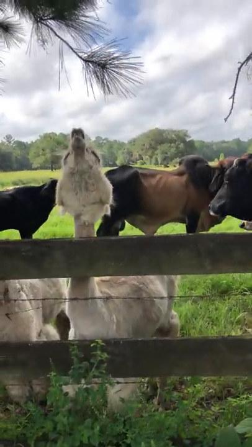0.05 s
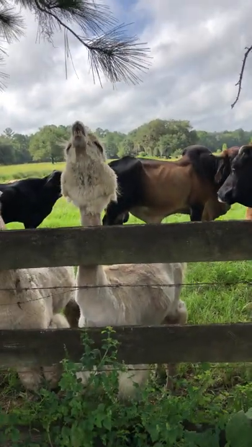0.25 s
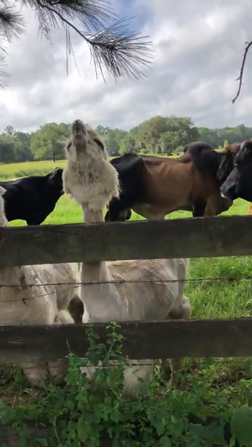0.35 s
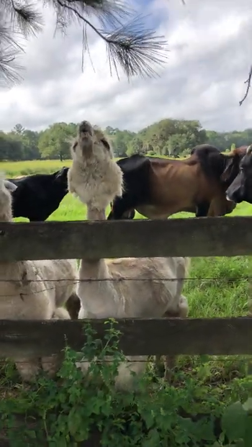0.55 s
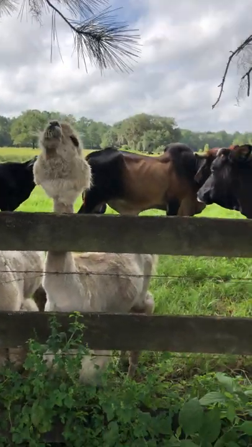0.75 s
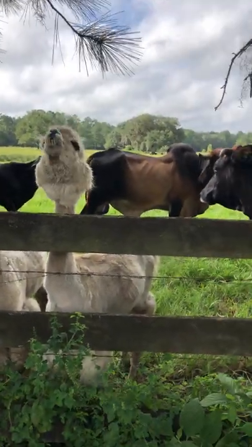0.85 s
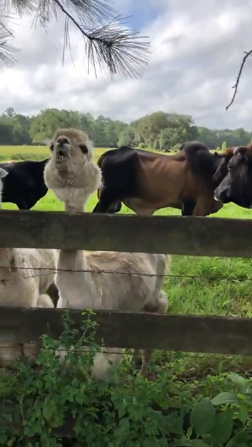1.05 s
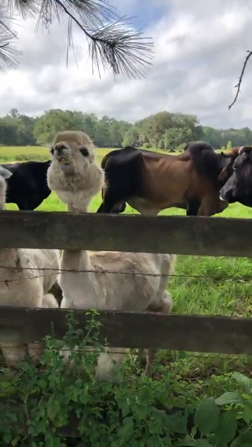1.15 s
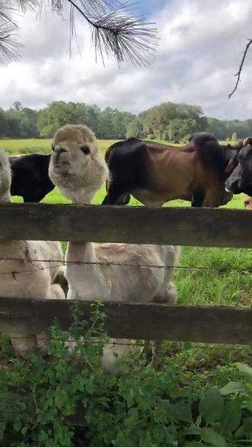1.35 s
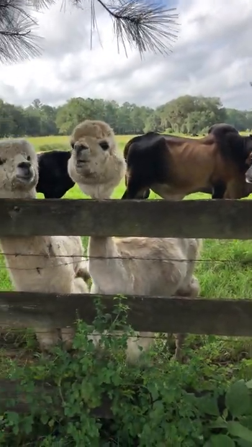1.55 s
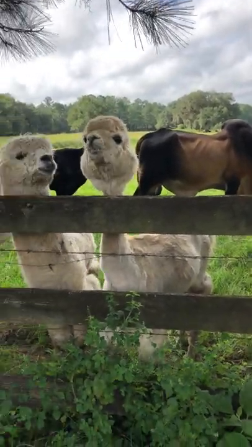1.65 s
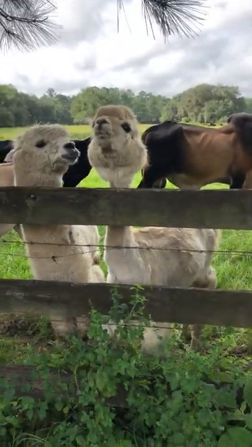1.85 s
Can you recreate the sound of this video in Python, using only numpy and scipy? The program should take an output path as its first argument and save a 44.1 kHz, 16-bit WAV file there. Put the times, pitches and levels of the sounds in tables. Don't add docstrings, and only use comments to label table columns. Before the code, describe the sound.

One cow's moo rises from closed-mouth hum to open bellow while wind buffets the microphone

```python
import sys
import numpy as np
from scipy import signal
from scipy.fft import rfft, irfft, next_fast_len
from scipy.io import wavfile
from scipy.ndimage import uniform_filter1d, map_coordinates

SR = 44100
rng = np.random.default_rng(int(sys.argv[2]) if len(sys.argv) > 2 else 0)


def makeup_ratio(level_db):
    decades = np.asarray(level_db, float) / 20
    return 10 ** decades


def unload_wav(signal):
    wavfile.write(
        sys.argv[1],
        SR,
        np.round(np.clip(np.atleast_2d(signal).T, -1, 1) * 32767).astype(np.int16),
    )


N = 83790


def unit(x):
    return x / np.sqrt(np.mean(x ** 2) + 1e-20)


def clock():
    return np.arange(N) / SR


def wobble(rate_hz):
    knots = rng.standard_normal(int(N * rate_hz / SR) + 4)
    return map_coordinates(knots, [clock() * rate_hz])


def filtered(x, response):
    m = next_fast_len(N + SR // 2)
    return irfft(rfft(x, m) * response(np.fft.rfftfreq(m, 1 / SR)), m)[:N]


def resonant(x, peaks):
    def response(f):
        total = 0
        for k, (hz, width_hz, db) in enumerate(peaks):
            band = 1j * f * width_hz
            total = total + (-1) ** k * makeup_ratio(db) * band / (hz * hz - f * f + band)
        return total
    return filtered(x, response)


def twice(x, hz, width_hz):
    once = resonant(x, [(hz, width_hz, 0)])
    return resonant(once, [(hz, width_hz, 0)])


def notched(x, hz, width_hz):
    depth = 0.75
    return x - depth * resonant(x, [(hz, width_hz, 0)])


def rush(spectrum):
    hz, db = np.transpose(spectrum)

    def response(f):
        return makeup_ratio(np.interp(np.log(f + 1), np.log(hz), db, -120, -120))
    return unit(filtered(rng.standard_normal(N), response))


def even(x, span_s):
    power = np.abs(uniform_filter1d(x ** 2, round(span_s * SR)))
    return unit(x / np.sqrt(power + 0.045))


def field():
    # (frequency [Hz], density [dB])
    air_spectrum = [(120, -79), (200, -0.5), (268, 1.5), (968, -5.5), (1320, -8.5), (1840, -11),
                    (5420, -15.5), (10100, -14), (16000, -27)]
    air_db, insect_db = -60, -66
    insect_hz, insect_width_hz = 10130, 510
    chorus = filtered(rng.standard_normal(N),
                      lambda f: np.exp(-0.5 * ((f - insect_hz) / insect_width_hz) ** 2))
    air = makeup_ratio(air_db + 0.17 * wobble(1.2)) * rush(air_spectrum)
    return air + makeup_ratio(insect_db + 0.73 * wobble(34.64)) * unit(chorus)


def grass():
    # (time [s], rise [s], fall [s], level [dB])
    rustles = [(0.552, 0.044, 0.032, -61), (.615, 0.016, 0.096, -64.5), (.79, 0.1, 0.12, -67.5),
               (.897, 0.03, 0.032, -59), (.985, 0.012, 0.014, -63.5), (1.27, 0.04, 0.025, -71),
               (1.497, 0.036, 0.089, -64), (1.6, 0.15, 0.14, -66), (1.72, 0.071, 0.1, -65.5),
               (1.9, 0.059, .03, -66)]
    # (frequency [Hz], density [dB])
    grass_spectrum = [(2000, 2.5), (4000, -2), (8000, 1), (12000, -3.5), (16000, 1.5)]
    # (time [s], peak [dB], centre [Hz], width [Hz])
    ticks = [
        (.3886, -35, 15300, 1500),
        (.3896, -38, 15000, 1500),
        (.3886, -45, 6000, 9000),
        (.389, -46, 3500, 1200),
        (.267, -46, 2050, 200),
        (.566, -52, 4000, 2000),
        (.684, -54, 4500, 2500),
        (.95, -48, 1000, 150),
        (.983, -50, 5000, 6000),
        (1.32, -54, 14000, 1500),
    ]
    tick_t60_s = 0.002
    t = clock()
    swish = 0
    for at, rise_s, fall_s, db in rustles:
        swish = swish + makeup_ratio(db) * np.exp(-((t - at) / np.where(t < at, rise_s, fall_s)) ** 2)
    x = swish * unit(makeup_ratio(2.7 * wobble(300)) * rush(grass_spectrum))
    for at, peak_db, hz, width_hz in ticks:
        decay = (t > at) * makeup_ratio(-60 * np.abs(t - at) / tick_t60_s)
        tick = resonant(decay * rng.standard_normal(N), [(hz, width_hz, 0)])
        x += makeup_ratio(peak_db) * tick / np.abs(tick).max()
    return x


def snort():
    # (frequency [Hz], density [dB])
    snout_spectrum = [(500, -20), (1300, 1), (2050, 4), (2400, 0.5), (2850, 0.5), (3500, -24), (4200, -30),
                      (4900, -3), (5800, -22)]
    # (time [s], level [dB], length [s])
    flaps = [
        (0.225, -57, .002),
        (.228, -45.5, 0.0025),
        (0.235, -62, .004),
        (.249, -59, 0.0043),
        (0.261, -63, .004),
        (0.267, -59, .006),
        (0.276, -66, .004),
        (0.308, -66, .005),
    ]
    # (time [s], level [dB])
    sigh_track = [(.22, -92), (.24, -63), (.35, -62.5), (.55, -60), (.64, -62), (.7, -67.5), (0.739, -64)]
    # (centre [Hz], width [Hz], level [dB])
    nostril_peaks = [(600, 700, -3), (1900, 600, -12), (4200, 500, -18)]
    snort_s, rise_s, snort_db, snort_t60_s = 0.2235, 0.0057, -58, 1
    whistle_from_hz, whistle_to_hz, whistle_width_hz, whistle_db = 2740, 2590, 150, -3.5

    t = clock()
    since = t - snort_s
    decay_db = snort_db - 60 * np.abs(since) / snort_t60_s
    puff = np.clip(since / rise_s, 0, 1) * makeup_ratio(decay_db + 2.5 * wobble(124.0))
    for at, db, length_s in flaps:
        puff += makeup_ratio(db) * np.exp(-8 * ((t - at) / length_s / 2) ** 2)

    s, db = np.transpose(sigh_track)
    sigh = makeup_ratio(np.interp(t, s, db, -120, -120) + 1.8 * wobble(78.4))
    fade = np.interp(t, s[[0, -1]], [0, np.pi / 2])
    high = unit(twice(rng.standard_normal(N), whistle_from_hz, whistle_width_hz))
    low = unit(twice(rng.standard_normal(N), whistle_to_hz, whistle_width_hz))
    whistle = makeup_ratio(whistle_db) * even(high * np.cos(fade) + low * np.sin(fade), 0.035)
    breath = unit(resonant(rush([(300, 0), (5000, 0)]), nostril_peaks))
    return puff * even(rush(snout_spectrum), 0.016) + sigh * (breath + whistle)


def wind():
    # (time [s], strength [dB])
    gust_track = [(0, -55), (.17, -51.5), (.205, -60), (.3, -44), (.354, -60.5), (.49, -43.5), (.528, -53),
                  (0.563, -42.5), (.608, -48.5), (.69, -36.5), (0.743, -36), (.824, -53.5), (.89, -41.5),
                  (1.15, -42.5), (1.3, -44), (1.53, -45), (1.6, -63.5), (1.9, -58.5)]
    # (frequency [Hz], density [dB])
    rumble_spectrum = [(13, -52), (22, -15), (48, 4), (86, 4), (168, -7.5), (300, -35), (390, -100),
                       (660, -120)]
    # (frequency [Hz], density [dB])
    flutter_spectrum = [(60, -4), (150, 6), (250, -2.5), (500, -14), (800, -19)]
    # (time [s], length [s], level [dB], top [Hz])
    slaps = [(0.14, 0.066, -51.5, 170), (0.25, 0.04, -44.5, 102), (0.292, 0.035, -49, 200),
             (0.548, 0.022, -52, 452), (0.665, 0.06, -41.5, 266), (1.186, 0.029, -35.5, 224),
             (1.243, 0.037, -34, 176), (0.142, 0.023, -61, 89), (0.964, 0.021, -39.5, 107),
             (1.057, 0.075, -36, 191.6), (1.099, 0.031, -40, 335), (1.166, 0.02, -35.5, 303),
             (0.72, 0.064, -38, 206), (1.211, 0.019, -34.5, 250), (1.228, 0.051, -40, 220),
             (1.363, 0.026, -46, 100), (1.53, 0.023, -42.5, 112), (0.647, 0.033, -50.5, 574),
             (1.12, 0.036, -44, 203)]
    # (frequency over top [1], density [dB])
    slap_shape = [(.25, -14), (.5, 0), (1, -3), (1.4, -30)]
    # (time [s], peak [dB], swing [Hz], length [s])
    jabs = [(0.2276, -37.5, 224, 0.0056), (.552, -43.5, 170, 0.013), (.567, -38, 72, 0.035),
            (.7, -33.5, 104, 0.028), (0.051, -50, 100, 0.031), (.7237, -31, 350, 0.005),
            (0.7684, -35.5, 255, 0.0067), (1.152, -31.5, 196, 0.011), (1.16, -41.5, 590, 0.0043),
            (1.175, -37.5, 665, 0.0054), (1.187, -31, 433, 0.0044), (1.195, -31.5, 228, 0.01),
            (1.2217, -28, 434, 0.0046), (1.231, -25, 263, 0.0071), (1.2342, -30.5, 480, .0055),
            (1.2385, -26, 380, 0.0039), (1.534, -49, 370, 0.017), (1.175, -26.5, 74, 0.029),
            (1.698, -36, 92.8, 0.039), (0.669, -32, 126, 0.019)]
    flutter_db, flutter_growth = -7.5, 1.47

    t = clock()
    s, db = np.transpose(gust_track)
    gust_db = np.interp(t, s, db)
    x = makeup_ratio(gust_db) * unit(makeup_ratio(1.5 * wobble(25)) * even(rush(rumble_spectrum), 0.04))
    flutter_track_db = db.max() + flutter_growth * (gust_db - db.max()) + flutter_db
    x += makeup_ratio(flutter_track_db) * unit(makeup_ratio(3 * wobble(40)) * rush(flutter_spectrum))
    for at, length_s, slap_db, top_hz in slaps:
        window = np.exp(-2 * ((t - at) / length_s * 2) ** 2)
        puff = window * rush(np.array(slap_shape) * [top_hz, 1])
        x += makeup_ratio(slap_db) * puff * np.linalg.norm(window) / np.linalg.norm(puff)
    for at, peak_db, swing_hz, length_s in jabs:
        window = np.exp(-8 * ((t - at) / length_s) ** 2)
        x -= makeup_ratio(peak_db) * window * np.cos(2 * np.pi * swing_hz * (t - at))
    return x


def moo():
    # (time [s], pulse rate [Hz], effort [dB])
    glottis_track = [(0, 84, -51.5), (0.081, 85.7, -47.5), (0.247, 92, -42.5), (0.405, 100.1, -44),
                     (0.575, 104.4, -46), (0.717, 109.4, -49), (0.785, 112.3, -43.5), (.93, 114.3, -45),
                     (1.064, 116.5, -42.5), (1.25, 117.9, -41), (1.399, 117.3, -40.5), (1.512, 116, -41),
                     (1.588, 111.5, -44), (1.625, 106, -41.5), (1.665, 94.6, -45), (1.71, 73.95, -51.5),
                     (1.735, 65.78, -58.5), (1.757, 64.38, -69)]
    # (centre [Hz], width [Hz], level [dB])
    nose_peaks = [(1315, 83, -6), (2300, 150, -28)]
    nose_late_peaks = [(1233, 35, 5.5), (2300, 200, -23)]
    mouth_early_peaks = [(990, 430, -16), (1445, 78, 5.5), (1860, 78, -1.5), (2270, 124, -18.5)]
    mouth_mid_peaks = [(980, 175, -5), (1453, 91, 6.5), (1860, 97, -2), (2250, 150, -19.5)]
    mouth_late_peaks = [(1007, 155, -10.5), (1480, 94, 3.5), (1866, 190, -7), (2306, 98, -19),
                        (2970, 83, -38), (3295, 49, -31.5)]
    mouth_closing_peaks = [(930, 290, -14), (1490, 68, -0.5), (1886, 71, -5), (2360, 160, -23.5)]
    # (time [s], level over the mouth [dB])
    throat_track = [(.75, -18), (.8, -1), (.93, -4.5), (.965, -17.5), (1.01, -4.5), (1.13, -1.5),
                    (1.2, -9.5), (1.33, -2.5), (1.47, -1.5), (1.525, -9), (1.557, 2), (1.6, -5),
                    (1.68, 5.5), (1.72, 1.5)]
    throat_hz, throat_width_hz = 339.3, 120
    last_pulse_s, open_s, opening_s = 1.751, 0.727, 0.014
    jitter, shimmer_db, breath_db = 0.0008, 0.3, -32
    creak_rougher, creak_breath_db = 3, 11
    lip_hz = 863

    t = clock()
    s, hz, db = np.transpose(glottis_track)
    creak = np.interp(t, (1.58, 1.68), [0, 1])
    rougher = 1 + creak_rougher * creak
    rate_hz = uniform_filter1d(np.interp(t, s, hz), size=900) * (1 + jitter * rougher * wobble(60.17))
    cycles = np.cumsum(rate_hz) / SR
    cycles -= cycles[round(last_pulse_s * SR)]
    harmonic = np.arange(1, 46)[:, None]
    pulses = unit(np.cos(2 * np.pi * harmonic * cycles).sum(axis=0))
    breath = unit(rng.standard_normal(N) * (1 + np.cos(2 * np.pi * cycles)))
    effort = makeup_ratio(np.interp(t, s, db) + shimmer_db * rougher * wobble(83))
    source = (pulses + makeup_ratio(breath_db + creak_breath_db * creak) * breath * 2) * effort
    source = source * (cycles < 0.5)

    mouth = np.clip((t - open_s) / opening_s, 0, 1)
    widen_s = (0.78, 0.953, 1.09)
    mid = np.interp(t, widen_s, [0, 1, 0])
    late = np.interp(t, widen_s, [0, 0, 1])
    closing = np.interp(t, (1.3, 1.75), [0, 1])
    sag = np.interp(t, (0.39, 0.74), [0, 1])

    hum = resonant(source * (1 - sag), nose_peaks)
    hum += resonant(source * sag * (1 - mouth), nose_late_peaks)
    half_open = resonant(source * mouth * (1 - mid - late), mouth_early_peaks)
    half_open += resonant(source * mid, mouth_mid_peaks)
    wide = resonant(source * late * (1 - closing), mouth_late_peaks)
    wide += resonant(source * closing, mouth_closing_peaks)
    voice = makeup_ratio(-5.5) * hum + notched(half_open, 1070, 160) + notched(wide, 2040, 200)
    lips = filtered(voice, lambda f: (1j * f / (lip_hz + 1j * f)) ** 4)

    throat_db = np.interp(t, *np.transpose(throat_track)) + 1.5 * wobble(25)
    throat = twice(source * mouth * makeup_ratio(throat_db), throat_hz, throat_width_hz)
    throat = resonant(throat, [(throat_hz, throat_width_hz, 0)])
    return makeup_ratio(9.5) * (makeup_ratio(5.5) * lips + throat)


def scattered(x):
    echo_db, echo_t60_s, echo_delay_s = -15, 0.16, 0.006
    t = np.arange(SR // 5) / SR
    tail = (t > echo_delay_s) * makeup_ratio(-60 * t / echo_t60_s) * rng.standard_normal(len(t))
    return x + makeup_ratio(echo_db) * signal.fftconvolve(x, tail / np.linalg.norm(tail))[:N]


def scene():
    around = field() + grass() + snort() + wind()
    return (around + scattered(moo()))[None]


def top_cut(x):
    return signal.sosfilt(signal.butter(12, 16810, fs=SR, output="sos"), x)


def record(dry):
    low_cut_hz, top_hz, ceiling = 46, 15800, 0.16
    x = filtered(dry[0], lambda f: (f < top_hz) * f ** 3 / np.sqrt(f ** 6 + low_cut_hz ** 6))
    x = x / (1 + np.abs(x / ceiling) ** 4) ** 0.25
    return top_cut(x[None])


dry = scene()
out = record(dry)
unload_wav(out)
```